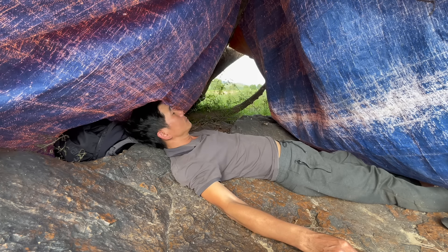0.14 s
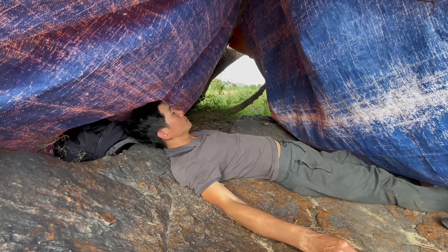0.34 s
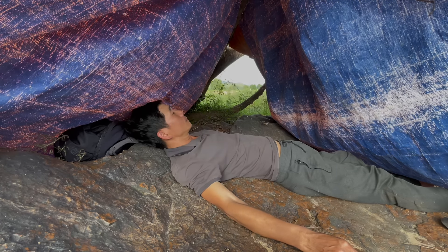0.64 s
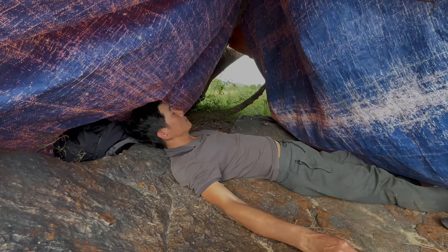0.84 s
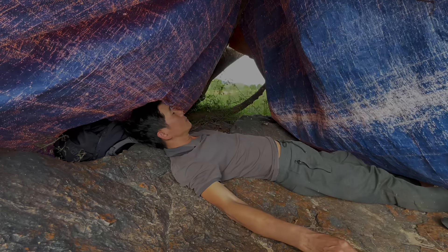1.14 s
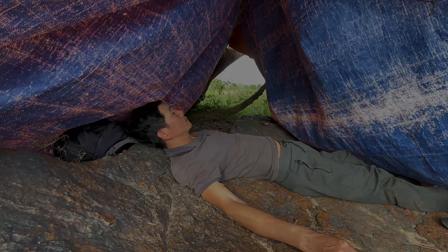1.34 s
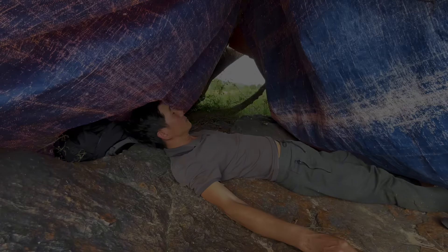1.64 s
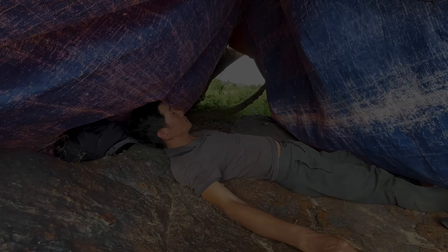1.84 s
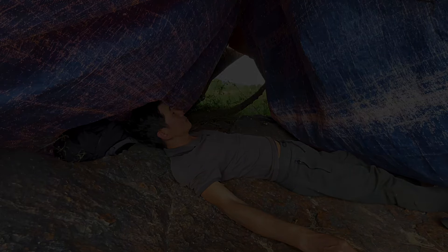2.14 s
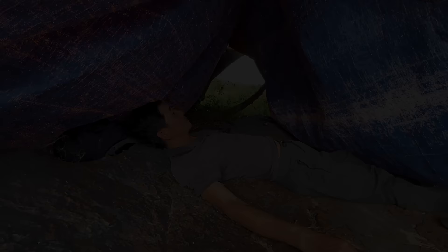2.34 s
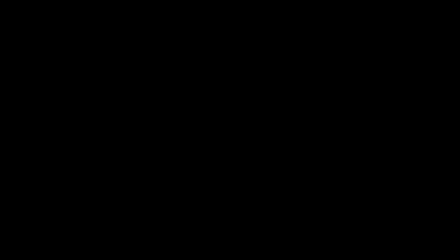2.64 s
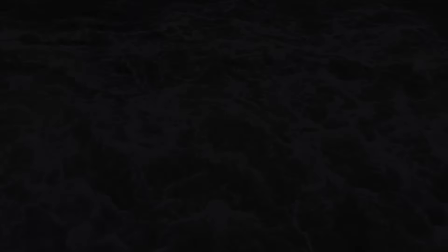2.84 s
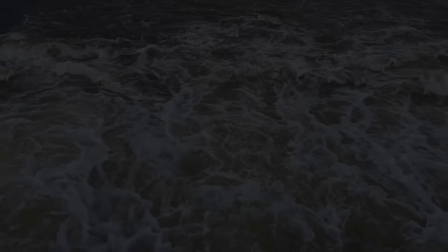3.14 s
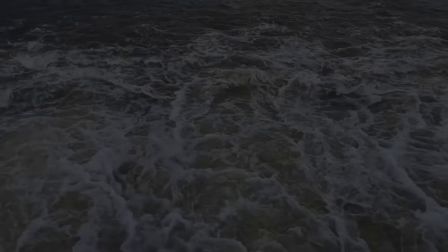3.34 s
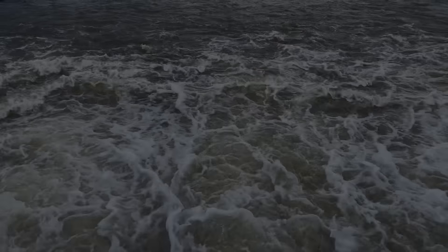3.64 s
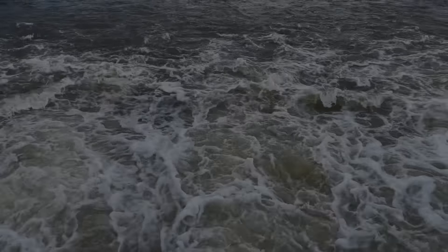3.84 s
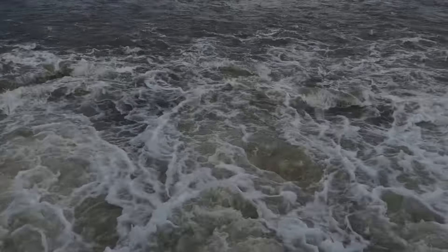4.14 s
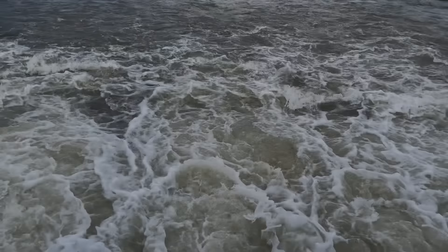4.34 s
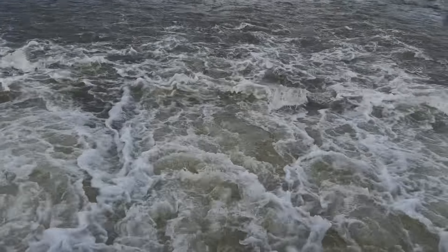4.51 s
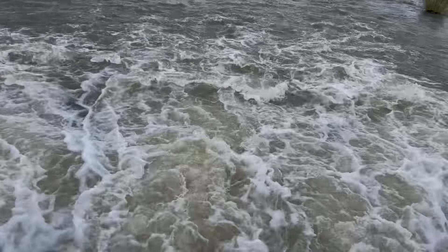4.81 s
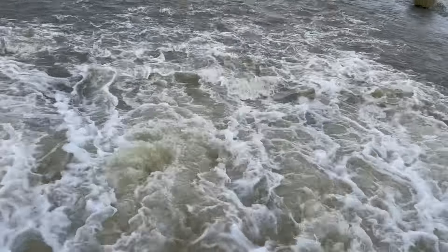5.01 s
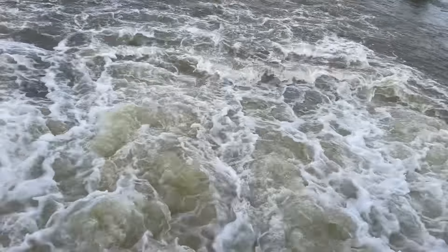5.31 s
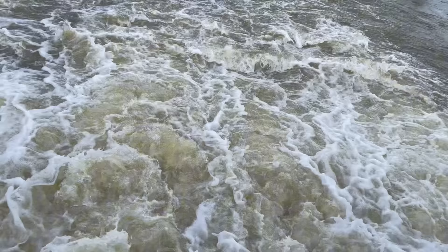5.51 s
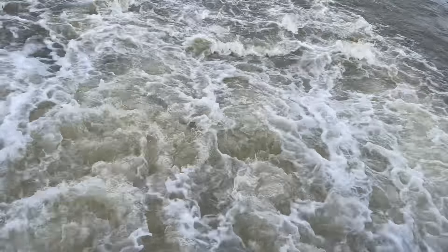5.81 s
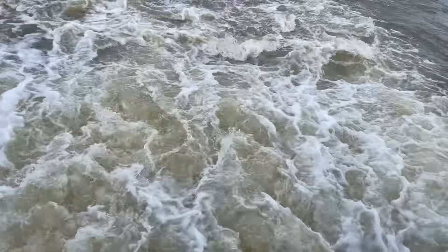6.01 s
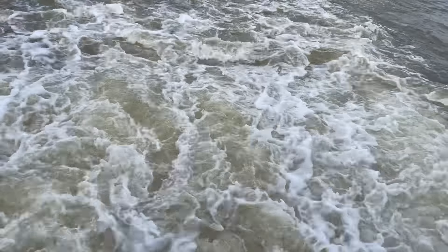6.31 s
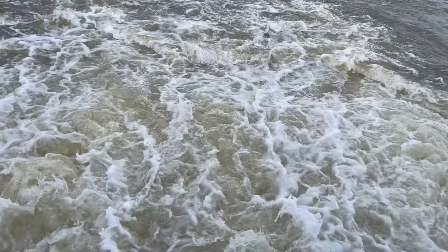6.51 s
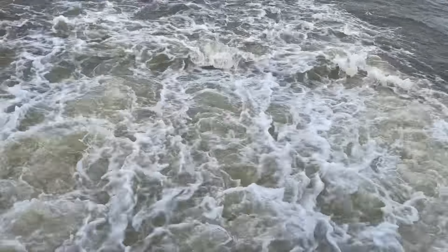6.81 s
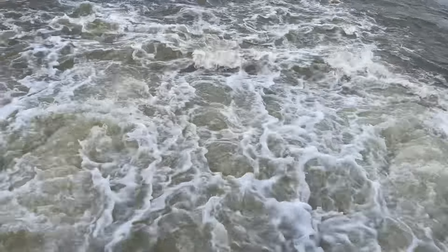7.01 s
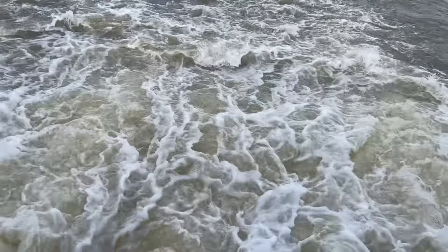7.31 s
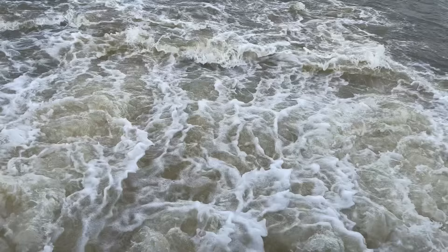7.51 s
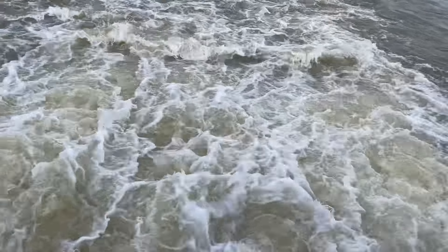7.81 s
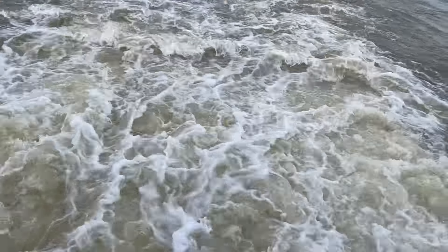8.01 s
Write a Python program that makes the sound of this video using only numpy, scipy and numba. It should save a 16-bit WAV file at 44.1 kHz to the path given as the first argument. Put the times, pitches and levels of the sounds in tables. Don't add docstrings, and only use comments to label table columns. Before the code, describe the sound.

Two outdoor places in succession. First a quiet meadow: distant river rumble, thin high insect buzzing, rapid cricket chirps, light puffs of wind and dry tarp ticks. Then, without any audible fade, white water below a dam roars loudly and continuously, hissing and bubbling, surging slightly, while low wind buffets thump the small camera's two microphones, strongest past the middle of the water passage.

```python
import sys
import numpy as np
from scipy import signal
from scipy.fft import rfft, irfft
from scipy.io import wavfile
from scipy.ndimage import uniform_filter1d
from numba import njit

SR = 44100
rng = np.random.default_rng(int(sys.argv[2]) if len(sys.argv) > 2 else 0)


def store_wav(level_fs):
    pcm = np.round(np.clip(np.atleast_2d(level_fs), -1, 1) * 32767)
    wavfile.write(sys.argv[1], SR, pcm.T.astype(np.int16))


def voltage_ratio(level):
    return 10 ** (np.asarray(level, float) / 20)


N = 359415
T = np.arange(N) / SR
HZ = np.maximum(np.fft.rfftfreq(N, 1 / SR), 1)
CUT_S = 2.6762

# freq_hz, likeness (0-1), right_phase_rad, left_minus_right_db
MEADOW_PORTS = [(40, 0.91, -.1, 1), (170, 1, 0.5, 0), (520, 0.01, -1, 3.5), (865, 0.3, -2, 1.5),
                (1100, 0.1, 0, 5), (2000, 0.47, -3.5, 1.5), (2700, 0, -4, 3.5), (5700, .08, -7, 6),
                (8100, 0.05, -6, 10.5), (9000, .5, -5.5, 2), (9830, 0.9, -2.5, 0), (10900, 1, -9, -3)]


def curves(table):
    s, *columns = np.transpose(table)
    return [np.interp(T, s, c) for c in columns]


def along_hz(table):
    hz, *columns = np.transpose(table)
    return [np.interp(np.log(HZ), np.log(hz), c) for c in columns]


def unit(x):
    return x / np.sqrt(np.mean(x ** 2))


def band(x, hz, width_hz):
    return irfft(rfft(x) * np.exp(-.5 * ((HZ - hz) / width_hz * 2) ** 2), N)


def walk(rate):
    k = int(SR / rate)
    held = np.repeat(rng.standard_normal(N // k + 1), k)
    slewed = uniform_filter1d(uniform_filter1d(held, k), k)[:N]
    return unit(slewed - slewed.mean())


def swell(start, length):
    return np.sin(np.pi * np.clip((T - start) / length, 0, 1)) ** .6


def whistle(start, length, hz0, hz1, db):
    u = np.clip((T - start) / length, 0, 1)
    cycles = length * u * (hz0 + (hz1 - hz0) * u / 2)
    return voltage_ratio(db) * swell(start, length) * np.sin(2 * np.pi * cycles)


@njit
def rings(start, hz, t60, size, glide):
    out = np.zeros(N)
    for k in range(len(start)):
        n = int(t60[k] * SR * .7)
        z = size[k] + 0j
        decay = np.exp(-6.9 / (t60[k] * SR))
        p = np.exp(2j * np.pi * hz[k] / SR)
        turn = np.exp(2j * np.pi * hz[k] * (glide - 1) / SR / n)
        for i in range(start[k], min(N, start[k] + n)):
            out[i] += z.imag
            z *= p * decay
            p *= turn
    return out


def ports(sounds, colour, likeness):
    gain = voltage_ratio(along_hz(colour)[0]) / (1 + (16 / HZ) ** 2)
    share, phase, pan_db = along_hz(likeness)
    share = np.clip(share, 0, 1)
    both, left, right = rfft(sounds) * gain
    shared, own = np.sqrt(share) * both, np.sqrt(1 - share)
    left = (shared + own * left) * voltage_ratio(pan_db / 2)
    right = (shared * np.exp(1j * phase) + own * right) * voltage_ratio(-pan_db / 2)
    return irfft([left, right], N)


def turbulence(shared_db, flicker_db, rate):
    noise = rfft(rng.standard_normal((3, N)))
    out, near = 0, walk(rate)
    for step in np.arange(-18, 6):
        near = 0.63 * near + 0.58 * walk(rate)
        mask = np.sqrt(np.clip(1 - 2 * abs(np.log2(HZ / 3200) - step / 2), 0, 1))
        treble = np.clip(1 + step / 14, .1, 1)
        level_db = treble * (shared_db * near + flicker_db * walk(2.7 * rate))
        out = out + irfft(noise * mask, N) * voltage_ratio(level_db)
    return unit(out)


def river():
    # freq_hz, level_db (per Hz)
    river_colour = [(22, -29), (48, -2), (90, -0.5), (170, -2.5), (340, -4.5), (600, -11), (720, -21),
                    (900, -24.5), (1400, -28), (2600, -32.5), (5500, -45), (7200, -39.5), (9700, -29.5),
                    (10500, -47)]
    level_db, fade_db_per_s = -49.5, 0.54
    rumble = unit(ports(turbulence(0.83, .7, 4.22), river_colour, MEADOW_PORTS))
    return rumble * voltage_ratio(level_db + 5.5 - fade_db_per_s * T)


def meadow_wind():
    # peak_s, level_db
    puffs = [
        (0, -49),
        (.29, -51),
    ]
    puff_s, breeze_db = .07, -67
    gust = voltage_ratio(breeze_db)
    for s, db in puffs:
        gust = gust + voltage_ratio(db) * np.exp(-((T - s) / puff_s) ** 2)
    return unit(band(rng.standard_normal((2, N)), 65, 60)) * gust * voltage_ratio(2.5 * walk(14.))


def tarp():
    # start_s, level_db, centre_hz, ring_s
    crackles = [
        (.478, -61.5, 2500, .02),
        (.758, -62, 2500, .02),
        (1.03, -62, 5200, .12),
        (1.275, -62, 4600, .02),
        (1.37, -64, 5000, .02),
        (2.273, -62, 2500, .02),
        (2.457, -52, 4850, .04),
        (2.531, -62, 2500, .02),
    ]
    out = 0
    for s, db, hz, ring in crackles:
        decay = np.exp(-6.9 * np.maximum(T - s, 0) / ring) * (T >= s)
        burst = rng.standard_normal((2, N)) * decay
        out = out + voltage_ratio(db + 6) * band(burst, hz, .22 * hz)
    return out * np.array([[1], [.55]])


def katydid():
    # start_s, length_s, level_db
    song_spells = [
        (.02, .28, -74),
        (1.02, .26, -76),
        (1.88, .33, -77),
    ]
    level = voltage_ratio(-89)
    for s, length, db in song_spells:
        level = level + voltage_ratio(db) * swell(s, length)
    return unit(band(rng.standard_normal(N), 7100, 200)) * level * voltage_ratio(3 * walk(30.)) * [[1], [.35]]


def bird():
    # start_s, length_s, from_hz, to_hz, level_db
    song_notes = [
        (1.44, .05, 4380, 4450, -79),
        (1.48, .14, 4430, 4520, -75),
        (1.61, .09, 4500, 4470, -74),
        (1.69, .05, 4460, 4350, -77),
        (1.76, .06, 4100, 4040, -71),
        (1.86, .04, 4000, 4080, -79),
    ]
    return sum(whistle(*note) for note in song_notes) * (1 + .6 * walk(250.))


def cricket():
    chirp_levels = [-66, -67, -67, -69, -68, -67, -68, -66, -66, -68, -72, -68, -69, -68]
    first_s, period_s, stroke_s, pitch_hz = .137, .1814, .019, 4310
    out = 0
    for i, db in enumerate(chirp_levels):
        for k in range(3):
            start = first_s + period_s * i + stroke_s * k
            out = out + whistle(start, .016, pitch_hz * (.94 + .025 * k), pitch_hz * 1.035, db - 3 * k)
    return out * (1 + .5 * walk(500.))


def singers():
    song = cricket() + bird()
    tail = np.exp(-6.9 * np.arange(6000) / SR / .14)
    scatter = rng.standard_normal((2, 6000)) * tail
    direct = np.array([song, .4 * np.roll(song, 9)])
    return direct + voltage_ratio(-24) * signal.fftconvolve(song[None], scatter, axes=1)[:, :N]


def cicadas(click_hz=123., throb_hz=8.1):
    # pitch_hz, width_hz, level_db
    bodies = [
        (8160, 390, -1),
        (8700, 490, -1.5),
        (7500, 900, -24),
    ]
    # time_s, effort_db
    effort = [
        (0, -70),
        (.9, -66.5),
        (1.6, -66.5),
        (2.66, -69),
    ]
    out = []
    for _ in range(3):
        clicks = np.cumsum(click_hz * (1 + 0.0298 * walk(2.8))) / SR
        throbs = np.cumsum(throb_hz * (1 + .1 * walk(2.09))) / SR
        gate = 1 + .5 * np.sin(2 * np.pi * clicks)
        throb = voltage_ratio(2.2 * np.sin(2 * np.pi * throbs))
        hiss = rng.standard_normal(N)
        ringing = sum(voltage_ratio(db) * band(hiss, hz, width) for hz, width, db in bodies)
        out.append(gate * throb * ringing)
    chorus = unit(ports(np.array(out), [(20, 0), (20000, 0)], MEADOW_PORTS))
    return chorus * voltage_ratio(curves(effort)[0] + 5.5)


def meadow():
    sound = river() + meadow_wind() + tarp() + katydid() + singers() + cicadas()
    return irfft(rfft(sound) / (1 + (HZ / 10700) ** 40), N)


def dam_wind():
    # time_s, level_db
    dam_breeze = [(2.68, -27), (3.05, -36), (3.45, -44), (3.8, -35), (4.6, -31.5), (6.4, -30.5), (7.0, -35),
                  (7.5, -29), (7.75, -44), (8.15, -35)]
    # peak_s, level_db
    buffets = [
        (4.42, -26),
        (5.3, -22),
        (5.75, -25),
        (5.99, -28),
        (6.33, -18),
        (6.78, -21),
        (7.43, -27),
    ]
    buffet_s, lull_at_s, lull_s = .03, 6.3, 0.059
    lull = 1 - 0.85 * np.exp(-((T - lull_at_s) / lull_s) ** 2)
    breeze = voltage_ratio(curves(dam_breeze)[0] + 2.5 * walk(12.)) * lull
    buffet = sum(voltage_ratio(db) * np.exp(-((T - s) / buffet_s) ** 2) for s, db in buffets) * voltage_ratio(3 * walk(40.))
    low, high = rng.standard_normal((2, 2, N))
    slope = HZ / 110 / (1 + (HZ / 110) ** 2) / (1 + (HZ / 700) ** 2)
    flutter = unit(irfft(rfft(high) * slope, N))
    return unit(band(low, 74, 80)) * breeze + flutter * (buffet + voltage_ratio(-6) * breeze)


def bubbles(per_s, low_hz, high_hz, turns, spread_db):
    when, pitch, size = rng.random((int(per_s * N / SR), 3)).T
    hz = low_hz * (high_hz / low_hz) ** pitch
    size_db = np.minimum(-spread_db * np.log(size), 12)
    return unit(rings((when * N).astype(np.int64), hz, turns / hz, hz * voltage_ratio(size_db), 1.3))


def water():
    # time_s, level_db
    surges = [(2.69, -21), (3.89, -22), (4.51, -19.5), (6.45, -20.5), (6.47, -22), (6.66, -18.5),
              (6.77, -24.5), (6.84, -19.5), (7.04, -21.5), (8.0, -19.5), (8.04, -22.5), (8.15, -18.5)]
    # freq_hz, level_db (per Hz)
    water_colour = [(20, -24), (34, -12), (72, -0.5), (125, -1), (300, -7.5), (700, -13.5), (1400, -21),
                    (2600, -22.5), (4300, -26), (6700, -25.5), (9600, -20), (11000, -28.5), (13000, -44),
                    (15500, -53.5)]
    # freq_hz, likeness (0-1), right_phase_rad, left_minus_right_db
    water_likeness = [(25, 0.99, 0.2, 0.1), (220, 1, -0.21, .1), (523, 0.91, -0.23, 0),
                      (930, 0.72, -0.5, 6.5), (1560, 0.98, 0.5, 0), (2240, 0.52, 0.53, 0.9),
                      (2900, 0.08, -1.5, 2), (4300, 0.31, -1.3, -1), (5090, 0.56, -4, -1.5),
                      (5780, 0.92, -6, -0.5), (7310, 1, -7.5, -1), (8000, 0.78, -9, 1),
                      (9520, 0.97, -9.5, -2.5), (12120, .9, -12.5, 1)]
    heave_db, heave_per_s = 0.68, 9.
    sway_db, sway_per_s = 0.48, 4.
    spray_level_db, spray_follows = -26.5, .35

    roar_db = curves(surges)[0] + heave_db * walk(heave_per_s)
    spray_db = spray_level_db + spray_follows * (roar_db - roar_db[T > CUT_S].mean())
    foam = [bubbles(3000, 300, 13000, turns=9., spread_db=2.5) for _ in range(3)]
    white = turbulence(0.78, 0.91, 5.4) + voltage_ratio(-8.5) * np.array(foam)
    sound = unit(ports(white, water_colour, water_likeness))
    roar = irfft(rfft(sound) / (1 + (HZ / 800) ** 2), N)
    spray = sound - roar
    swing_db = sway_db * walk(sway_per_s)
    balance = voltage_ratio(np.array([swing_db, -swing_db]) / 2)
    return (roar * voltage_ratio(roar_db + 1.54) + spray * voltage_ratio(spray_db + 9.5)) * balance


def camera(sound, pair_db, top_db, top_hz):
    band_edges = np.r_[0, 240, 264, 292, 320:929:32, 942]
    mix = np.array([[1, 1], [1, -1]])
    hz, s, z = signal.stft(mix @ sound / 2, SR, "cosine", 1882)
    power, widths = np.abs(z) ** 2, np.diff(band_edges)
    bands = np.add.reduceat(power, band_edges[:-1], axis=1) / widths[:, None]
    frames = np.minimum(s * SR, N - 1).astype(int)
    wander_db = np.array([1.5 * walk(28.)[frames] for _ in widths])
    weak = bands < bands[::-1] * voltage_ratio(2 * (pair_db + wander_db))
    weak[:, 0] = False
    lucky = rng.random(bands.shape) < [[[.012]], [[.002]]]
    luck_db = 0.84 * rng.exponential(size=bands.shape) + 14 * lucky
    masker = bands[:, 4:7].sum(axis=0).mean(axis=0)
    cells = np.repeat(uniform_filter1d(power, size=8, axis=1)[:, 4::8], 8, axis=1)
    threshold_db = top_db - np.repeat(luck_db, widths, axis=1)[:, :928]
    faint = np.ones(z.shape, bool)
    faint[:, :928] = cells[:, :928] < masker * voltage_ratio(2 * threshold_db)
    faint[:, hz < top_hz] = False
    floor = .45 * np.clip(hz / 4000, 0, 1)
    faint |= power < uniform_filter1d(power, size=16, axis=1) * floor[:, None]
    side_excess = power[1] - voltage_ratio(2 * -21) * power[0]
    faint[1, :100] |= uniform_filter1d(side_excess, size=4, axis=0)[:100] < 0
    faint[:, 200:520] |= (cells < cells[::-1] * voltage_ratio(2 * (pair_db - 2)))[:, 200:520]
    dropped = np.repeat(weak, widths, axis=1) | faint
    return mix @ signal.istft(z * ~dropped, SR, "cosine", 1882)[1][:, :N]


def scene():
    before = camera(meadow(), pair_db=-40., top_db=-20., top_hz=9700.)
    after = camera(water() + dam_wind(), pair_db=-9.5, top_db=-22., top_hz=11200.)
    return np.where(T < CUT_S, before, after)


def roll_off(x):
    return signal.sosfilt(signal.butter(12, 14800, fs=SR, output="sos"), x)


def record(dry):
    return roll_off(dry)


dry = scene()
out = record(dry)
store_wav(out)
```